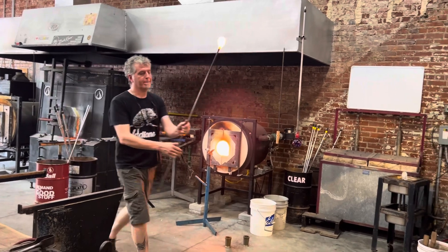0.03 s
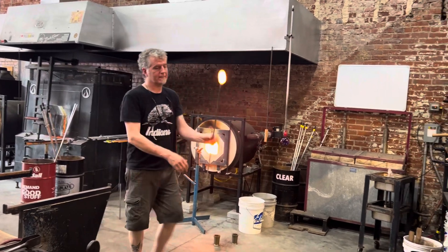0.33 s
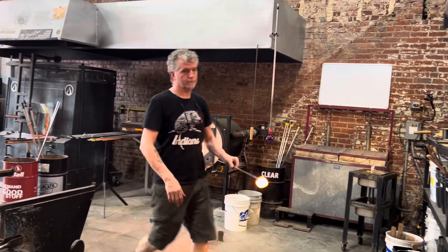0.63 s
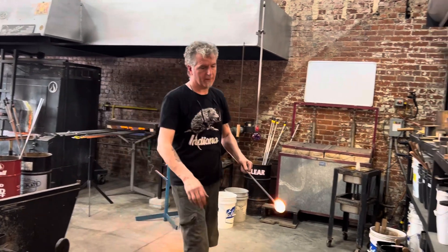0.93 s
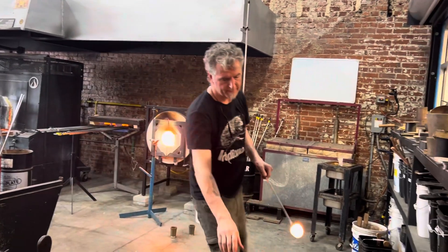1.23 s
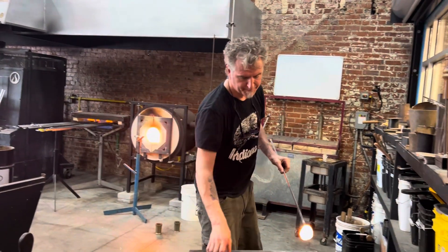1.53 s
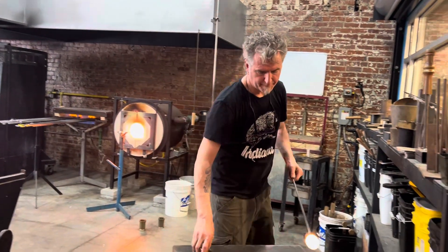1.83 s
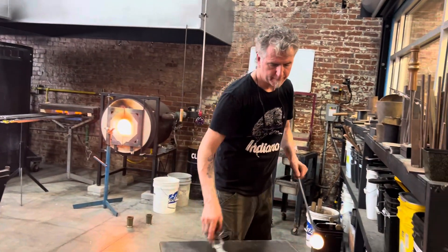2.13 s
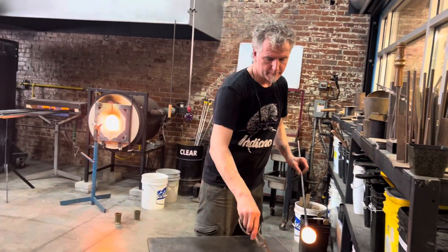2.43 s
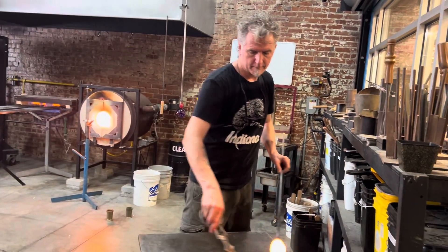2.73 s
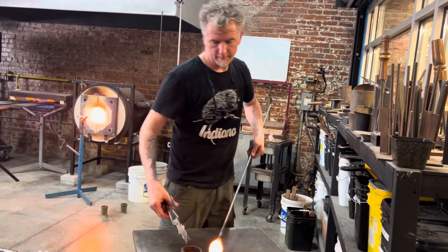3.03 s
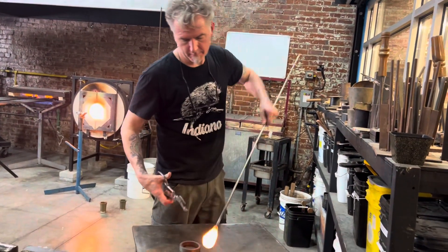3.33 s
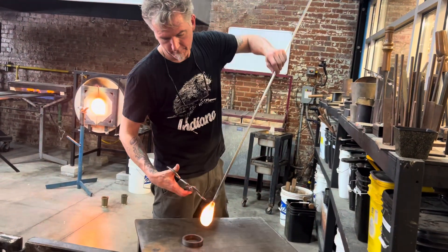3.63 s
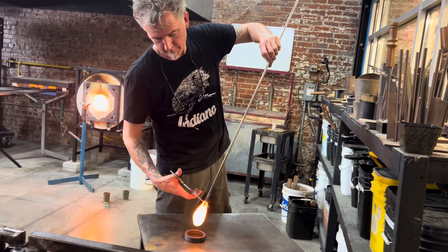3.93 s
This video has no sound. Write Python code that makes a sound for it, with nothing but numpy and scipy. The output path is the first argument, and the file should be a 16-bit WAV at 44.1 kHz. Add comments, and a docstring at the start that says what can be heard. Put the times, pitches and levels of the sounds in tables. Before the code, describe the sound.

A glass furnace roars steadily while steel tongs clank and scrape on a steel table.

```python
"""A brick workshop, heard through a stereo pair standing by a gas-fired glass furnace.
From the start the flame roars and the chamber booms, over a blower's hum and thin whine.
Shoes scuff softly, and near 1.8 s a steel rod ticks against metal. At 2.5 s, in the foreground,
steel tongs clank on the steel table and are dragged off it, rasping and squealing.
One last scuff follows, the boom swells on, and the furnace is left roaring."""
import sys
import numpy as np
from scipy import signal
from scipy.fft import rfft, irfft
from scipy.io import wavfile

SR = 44100
rng = np.random.default_rng(int(sys.argv[2]) if len(sys.argv) > 2 else 0)


def int16_out(signal):
    """Quantize to a 16-bit WAV file."""
    q = np.round(np.clip(np.atleast_2d(signal).T, -1, 1) * 32767)
    wavfile.write(sys.argv[1], SR, q.astype(np.int16))


N = 176400


def from_db(db):
    """Decibels to gain."""
    return 10 ** (np.asarray(db) / 20)


def rms_one(x):
    """Scale to rms 1."""
    return x / np.sqrt(np.mean(x ** 2) + 1e-20)


def seconds():
    """The time of each sample."""
    return np.arange(N) / SR


def in_time(rows):
    """Each column of a curve, at every sample."""
    times, *columns = np.transpose(rows)
    return [np.interp(seconds(), times, column) for column in columns]


def at_hz(points, hz):
    """Read a table on a log-frequency axis."""
    frequencies, values = np.transpose(points)
    return np.interp(np.log(hz), np.log(frequencies), values)


def drift(rate):
    """A smooth random wander of rms 1, mostly slower than rate [Hz]."""
    step, settle = 40, 2000
    r = np.exp(-2 * np.pi * rate * step / SR)
    white = rng.standard_normal(N // step + settle + 2)
    slow = signal.lfilter([1], [1, -2 * r, r * r], white)[settle:]
    return np.interp(np.arange(N) / step, np.arange(len(slow)), rms_one(slow))


def tone(hz, wander_hz, rate):
    """A sine of rms 1 whose pitch wanders."""
    return np.sqrt(2) * np.sin(2 * np.pi * np.cumsum(hz + wander_hz * drift(rate)) / SR)


def swell(s, length):
    """A smooth rise and fall around a moment."""
    return np.exp(-2 * ((seconds() - s) / length) ** 2)


def pan(db):
    """Left and right gains for a level difference."""
    return from_db(np.array([[.5], [-.5]]) * db)


# How alike the room sounds at the two microphones: (frequency [Hz], correlation)
MIC_LIKENESS = [(40, .995), (65, .98), (110, .94), (200, .7), (400, .68), (700, .36), (1300, .12),
                (2400, .45), (5000, .3), (7500, .55), (9500, .99), (15000, .92)]
# The room leans to the left microphone: (frequency [Hz], left over right [dB])
MIC_BALANCE = [(70, .2), (160, 2.6), (500, 1.3), (2000, 2.0), (5000, 1.3), (13000, .2)]

def spread(mid, side, hz):
    """Two unrelated signals become left and right, as alike as the room makes them."""
    alike = np.clip(at_hz(MIC_LIKENESS, hz), -.99, .995)
    pair = np.sqrt(1 + alike) * mid + np.sqrt(1 - alike) * side * [[1], [-1]]
    return pan(at_hz(MIC_BALANCE, hz)) * pair


def noise(colour, peaky_db=0):
    """Stereo noise of rms 1, cut below its colour's lowest point; peaky_db adds random resonances."""
    hz = np.maximum(np.fft.rfftfreq(N, 1 / SR), 1)
    spacing_hz = 70
    peaks = np.interp(hz / spacing_hz, np.arange(SR), rng.uniform(-1, 1, SR)) * np.sqrt(3)
    gain = from_db(at_hz(colour, hz) + peaky_db * peaks) / np.sqrt(1 + (colour[0][0] / hz) ** 10)
    spectrum = spread(*rfft(rng.standard_normal((2, N))), hz)
    return rms_one(irfft(spectrum * gain, N))


def wavering(hz, wander_hz, pitch_rate, swing_db, swing_rate):
    """A tone that wavers in pitch and level, differently at each microphone."""
    mid, side = (rms_one(from_db(swing_db * drift(swing_rate)) * tone(hz, wander_hz, pitch_rate))
                 for _ in range(2))
    return spread(mid, side, hz)


def workshop(x, room_db):
    """Add the tail off the brick walls, whose treble dies first."""
    t = seconds()[:SR]
    split_hz, tail = 3650, 0
    for band, t60 in ("low", .96), ("high", .37):
        crossover = signal.butter(2, split_hz, band, fs=SR, output="sos")
        tail = tail + signal.sosfilt(crossover, rng.standard_normal((2, SR))) * from_db(-60 * t / t60)
    tail *= np.minimum(t / .0014, 1)
    tail = irfft(spread(*rfft(tail), np.arange(SR // 2 + 1) + 1), SR)
    return x + from_db(room_db) * signal.fftconvolve(x, rms_one(tail) / np.sqrt(SR), axes=1)[:, :N]


# The blower's whine at the microphones: (time [s], level [dB], left over right [dB])
BLOWER_WHINE = [(0, -44.5, -4), (.2, -49, 3), (.66, -44, 4), (1.15, -53, 2), (1.43, -49.5, 2),
                (1.65, -52.5, 9), (1.98, -45.5, 1), (2.35, -52, 10), (2.8, -49, 7), (3.3, -62.5, 31.5),
                (4, -56.5, 11)]

def blower():
    """A thin whine in the background that swells, fades and shifts between the sides."""
    db, side_db = in_time(BLOWER_WHINE)
    return pan(side_db) * from_db(db + .96 * drift(4.6)) * tone(hz=2170, wander_hz=1.7, rate=14)


# Burner and blower hums: (frequency [Hz], pitch wander [Hz], level [dB])
MACHINE_HUMS = [(38.9, 3.73, -41.5), (200.9, 3.17, -45.5), (230.7, 2.02, -45.5), (404.5, 3.3, -43),
                (820, 3.2, -52.5)]

def hums():
    """Burner and blower fill the room with low, wavering tones."""
    return sum(from_db(db) * wavering(hz, wander_hz, pitch_rate=13, swing_db=2.5, swing_rate=7.8)
               for hz, wander_hz, db in MACHINE_HUMS)


# The chamber's low resonance: (time [s], level [dB])
LOW_BOOM = [(0, -32.5), (1.5, -41), (2.3, -39), (2.68, -40), (2.735, -28), (2.81, -43), (2.93, -26.5),
            (3.1, -30), (3.34, -26.5), (3.47, -30), (3.54, -46), (3.74, -27.5), (3.86, -32), (3.92, -42)]
# Its upper resonance, rising at first as it fades: (time [s], frequency [Hz], level [dB])
HIGH_BOOM = [(0, 93, -24), (.3, 96, -30), (.5, 95, -32), (.8, 100, -50), (1, 109, -33.5), (1.5, 115, -40),
             (1.8, 112, -41), (4, 102, -54)]

def chamber():
    """Two resonances of the furnace chamber come and go, dead centre between the microphones."""
    low_db, = in_time(LOW_BOOM)
    high_hz, high_db = in_time(HIGH_BOOM)
    low_hz = 68.95
    low = tone(low_hz, wander_hz=2.22, rate=11.9)
    octave = from_db(-14) * tone(2 * low_hz, wander_hz=7.72, rate=10.2)
    high = from_db(high_db + 3.2 * drift(3.7)) * tone(high_hz, wander_hz=3.68, rate=13)
    return from_db(low_db) * (low + octave) + high


# Flame and air noise: (frequency [Hz], relative level [dB])
FLAME_COLOUR = [(48, -3), (62, -4.5), (85, -4.5), (120, -7), (150, -8.5), (230, -11), (290, -12),
                (375, -13), (420, -10), (500, -17), (700, -21), (1400, -22.5), (2100, -29), (2700, -33),
                (4000, -39.5), (7800, -45), (8900, -49), (10000, -117), (11400, -46.5), (14600, -56.5),
                (16000, -69)]

def flame():
    """The gas flame's broad, fluttering roar lies under everything."""
    flutter_db = .91 * drift(13.7)
    return from_db(-30 + flutter_db) * noise(FLAME_COLOUR)


# Scuffs on the workshop floor: (time [s], length [s], level [dB])
SHOE_SCUFFS = [(0.452, 0.084, -50.5), (0.707, 0.1, -57), (0.983, 0.069, -51.5), (1.52, 0.078, -50),
               (3.163, 0.031, -58)]
# A sole's hiss: (frequency [Hz], relative level [dB])
SOLE_COLOUR = [(1500, -8), (4500, 1), (7500, 3.5), (12500, -7), (16000, -1)]

def shoes():
    """Short, gritty hisses of soles on concrete."""
    gritty_hiss = noise(SOLE_COLOUR) * from_db(3 * drift(150))
    return gritty_hiss * sum(from_db(db) * swell(s, length) for s, length, db in SHOE_SCUFFS)


def struck_level(hits, t60):
    """Each contact adds energy, which then dies away."""
    times, db = np.transpose(hits)
    energy = np.zeros(N)
    energy[(times * SR).astype(int)] = from_db(db) ** 2
    decay = from_db(-60 / (t60 * SR)) ** 2
    return np.sqrt(signal.lfilter([1], [1, -decay], energy + 1e-24))


def clear_modes(hits, modes):
    """The modes of struck steel that stand out, each beating and wavering as it dies."""
    out = 0
    for hz, db, t60 in modes:
        mode = wavering(hz, wander_hz=13, pitch_rate=110, swing_db=3.5, swing_rate=61)
        out = out + from_db(db) * struck_level(hits, t60) * mode / np.sqrt(2)
    return out


# The rod meets metal: (time [s], strength [dB], t60 [s], favoured band [Hz])
ROD_CONTACTS = [(1.782, -23, .045, 12500), (1.8458, -3, .012, 14300), (1.8487, -2, .02, 9000),
                (1.9335, -15, .09, 5300), (1.939, -16.5, .1, 8650)]
# The rod's modes: (frequency [Hz], level [dB], t60 [s])
ROD_RING = [(5250, -52, .4), (5580, -41, .22), (6860, -28, .025), (12280, -33, .07)]
# The crack of each contact: (frequency [Hz], relative level [dB])
TICK_COLOUR = [(2500, -14), (4200, -14.5), (5500, -3), (6200, -16), (6900, -3), (7900, -10), (8900, 1),
               (10300, -17), (12300, 1), (13400, -13), (14300, -2), (16000, -22)]

def rod():
    """A bright tick of steel on steel and a softer rebound; each contact point favours its own band."""
    out = clear_modes([hit[:2] for hit in ROD_CONTACTS], ROD_RING)
    for s, db, t60, hz in ROD_CONTACTS:
        crack = noise(TICK_COLOUR)
        focus = from_db(1.5) * signal.lfilter(*signal.iirpeak(hz, Q=17, fs=SR), crack)
        out = out + from_db(-17.5) * struck_level([(s, db)], t60) * (crack + focus)
    return workshop(out, room_db=-4)


# The tongs land and chatter: (time [s], strength [dB])
TONG_CONTACTS = [(2.4716, 1), (2.4748, 2), (2.4801, -1), (2.4838, -5), (2.4902, -6), (2.5098, -18)]
# The tongs' modes: (frequency [Hz], relative level [dB], t60 [s])
TONG_RING = [(1130, -9, .09), (1760, -9, .12), (2239, -16, .35), (2482, -13, .5), (3548, -13.5, .33),
             (3740, -9, .1), (4307, -12, .26), (4912, -13.5, .35), (5082, -14, .34), (5560, 0, .07),
             (6560, -8, .12), (6840, -3, .34), (7294, -10, .3), (7730, -5, .13), (8140, -7, .2),
             (12700, -16, 1.0), (12880, -22, 1.1)]
# The table's crack on impact: (frequency [Hz], relative level [dB])
IMPACT_COLOUR = [(400, -6), (1000, -2.5), (1450, -3), (2400, 3), (3200, -18.5), (3700, -9), (4700, -6),
                 (6200, 1), (7400, 1), (8300, 3), (9600, -14), (10800, -4), (12500, 0), (14000, 5),
                 (15800, -13)]
# The table top's dense, longer ring: (frequency [Hz], relative level [dB])
TABLE_COLOUR = [(450, -2), (1000, -1), (1500, -15), (2200, 2.5), (3200, -6.5), (4500, -1.5), (6000, -5),
                (7400, 6.5), (8800, 0.5), (10000, -32), (12000, -6), (15500, -25)]

def tongs_clank():
    """The tongs strike the steel table: a crack, then both ring on."""
    crack = from_db(-20.5) * struck_level(TONG_CONTACTS, t60=.035) * noise(IMPACT_COLOUR)
    table = from_db(-29.5) * struck_level(TONG_CONTACTS, t60=.33) * noise(TABLE_COLOUR, peaky_db=2.5)
    return crack + table + from_db(-29.5) * clear_modes(TONG_CONTACTS, TONG_RING)


def ring(drive, hz, t60):
    """A unit click sets a sine of height 1 ringing."""
    r, w = from_db(-60 / (t60 * SR)), 2 * np.pi * hz / SR
    return signal.lfilter([0, np.sin(w)], [1, -2 * r * np.cos(w), r * r], drive + 1e-18)


# The tongs bear on the table as they slide: (time [s], relative pressure [dB])
DRAG_PRESSURE = [(2.52, -4), (2.6, -11.5), (2.68, -8), (2.74, -4.5), (2.82, -8), (2.92, -12), (3.03, -23.5),
                 (3.15, -22)]
# Steel rasping over steel: (frequency [Hz], relative level [dB])
RASP_COLOUR = [(700, 2), (1600, 5.5), (2500, 4.5), (3400, -3.5), (5000, -5.5), (7000, -7.5), (9000, -28),
               (15000, -37)]
# Squeals as the steel sticks and slips: (time [s], length [s], frequency [Hz], level [dB])
DRAG_SQUEALS = [(2.717, 0.028, 1596, -38.5), (2.813, 0.026, 1592, -41.5), (2.73, 0.14, 2410, -45),
                (2.803, 0.082, 4750, -51.5), (2.925, 0.046, 2478, -46), (3.015, 0.019, 2500, -45)]

def tongs_drag():
    """The tongs slide off the table; tiny slips keep the steel ringing, rasping and squealing."""
    sliding = (seconds() > DRAG_PRESSURE[0][0]) & (seconds() < DRAG_PRESSURE[-1][0])
    pressure = from_db(in_time(DRAG_PRESSURE)[0]) * sliding
    slips_per_s = 1200
    slips = pressure * (rng.random(N) < slips_per_s / SR) * rng.standard_normal(N)
    rings = from_db(-57.5) * sum(from_db(db) * ring(slips, hz, t60) for hz, db, t60 in TONG_RING)
    rasp = pressure * from_db(-33 + 2 * drift(50)) * noise(RASP_COLOUR)
    squeals = sum(from_db(db + 2 * drift(60)) * swell(s, length) * tone(hz, wander_hz=16, rate=118)
                  for s, length, hz, db in DRAG_SQUEALS)
    return rings + rasp + squeals


def scene():
    """The furnace behind, and the work in front of it."""
    furnace = flame() + hums() + chamber() + blower()
    return furnace + shoes() + rod() + workshop(tongs_clank() + tongs_drag(), room_db=-6.5)


def record(dry):
    """The stereo pair: the right channel's phase turns in the high treble, and the top is cut."""
    turn_hz, turn_width_hz, cutoff_hz = 10000, 2600, 16000
    r, w = np.exp(-np.pi * turn_width_hz / SR), 2 * np.pi * turn_hz / SR
    poles = [1, -2 * r * np.cos(w), r * r]
    right = signal.lfilter(poles[::-1], poles, dry[1])  # all-pass
    lowpass = signal.ellip(10, .2, 80, cutoff_hz, fs=SR, output="sos")
    return signal.sosfilt(lowpass, np.array([dry[0], right]))


dry = scene()
out = record(dry)
int16_out(out)
```